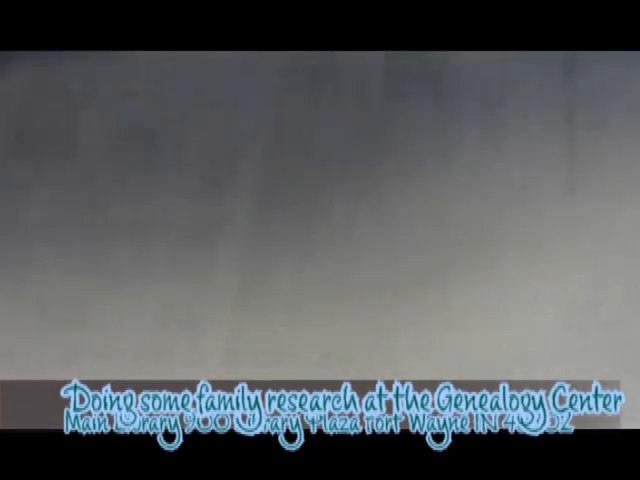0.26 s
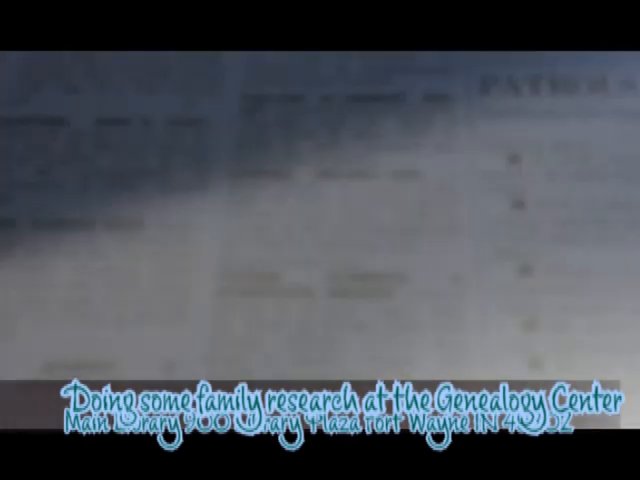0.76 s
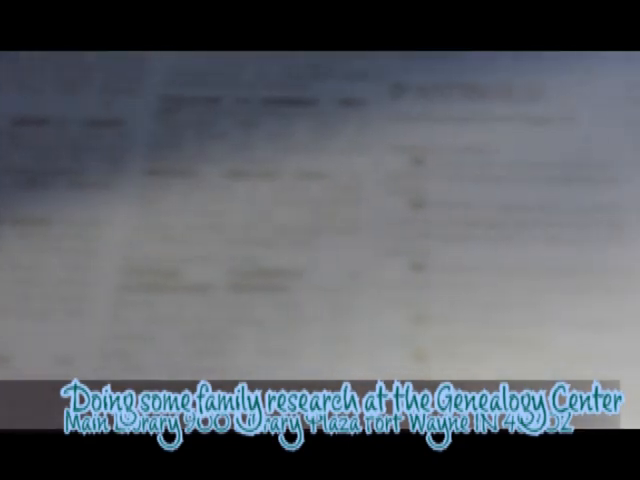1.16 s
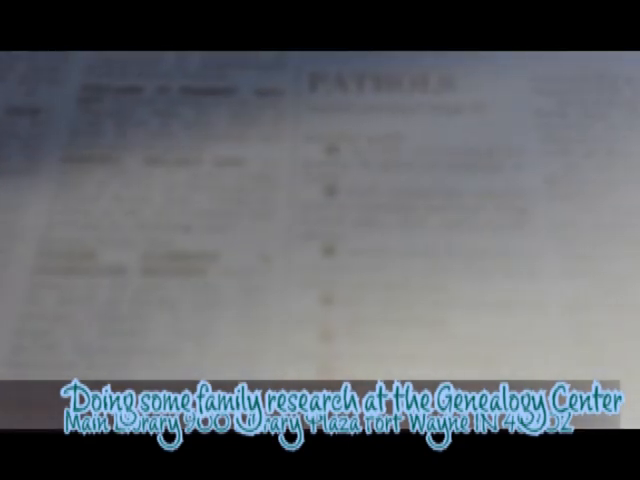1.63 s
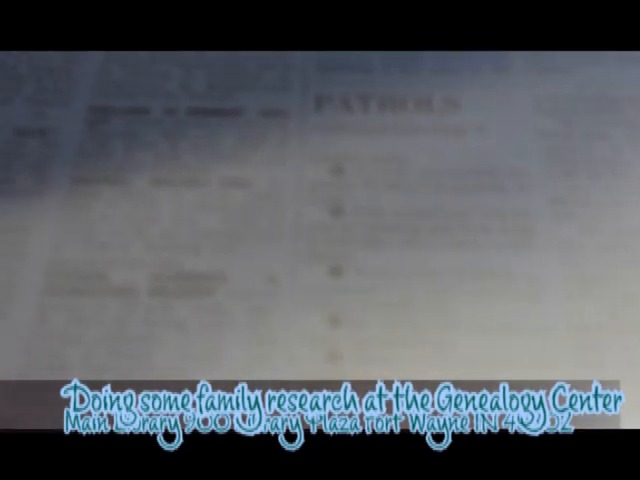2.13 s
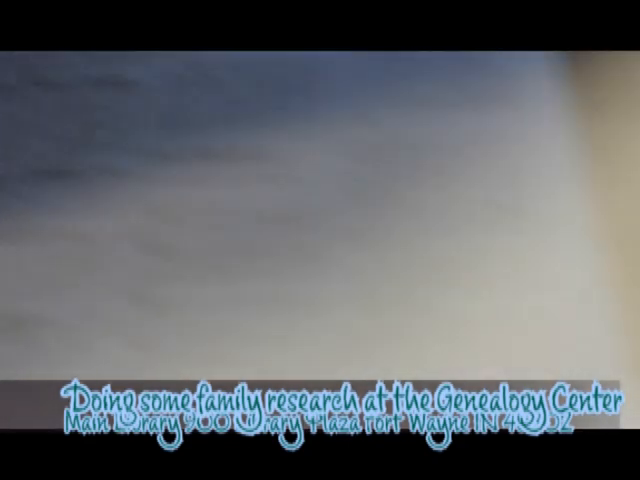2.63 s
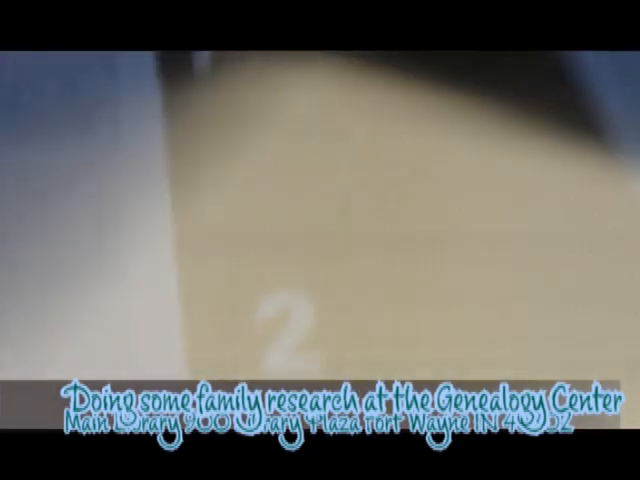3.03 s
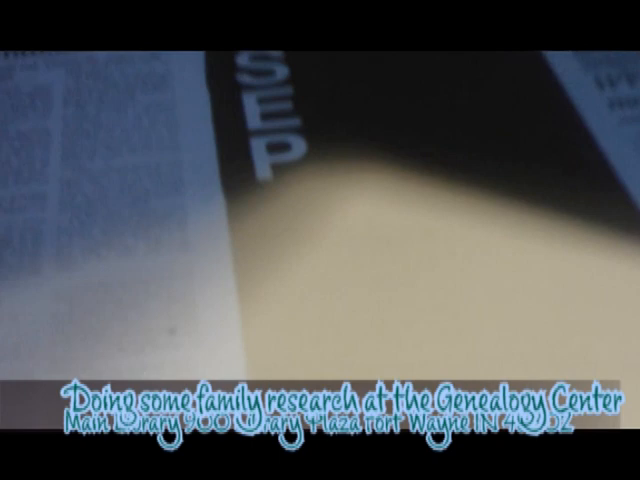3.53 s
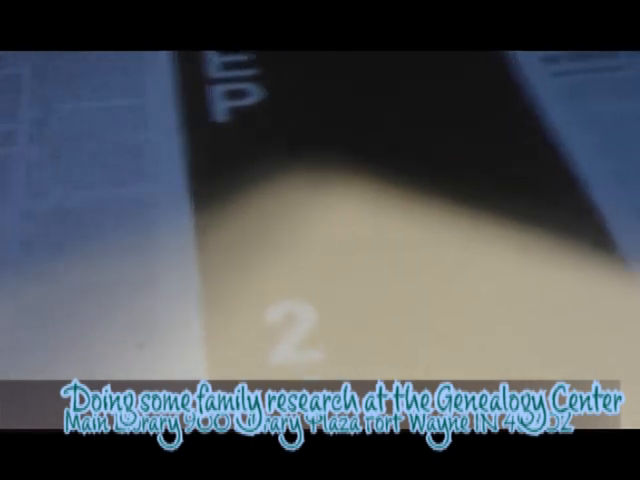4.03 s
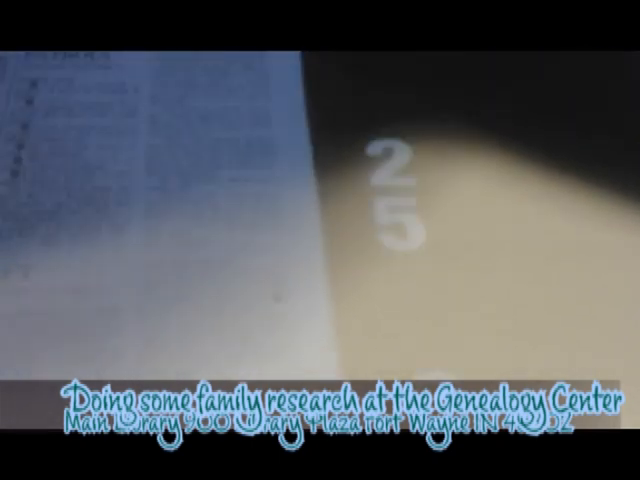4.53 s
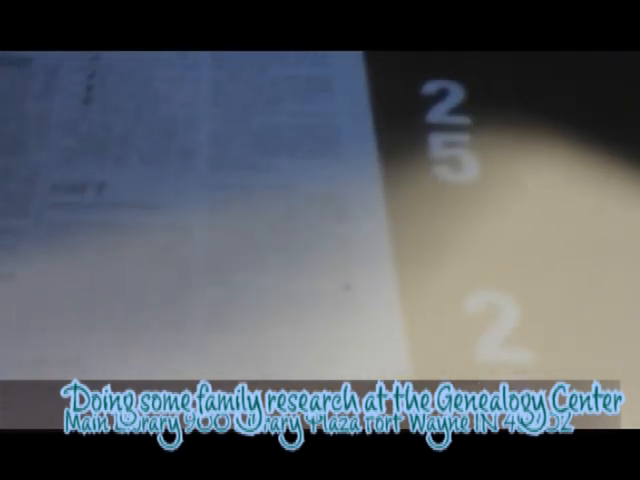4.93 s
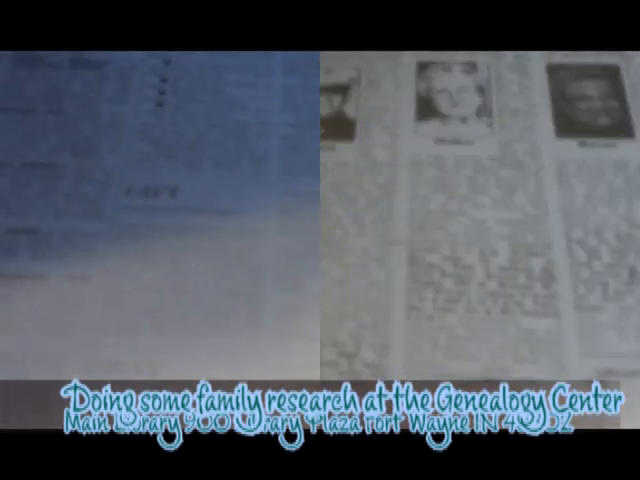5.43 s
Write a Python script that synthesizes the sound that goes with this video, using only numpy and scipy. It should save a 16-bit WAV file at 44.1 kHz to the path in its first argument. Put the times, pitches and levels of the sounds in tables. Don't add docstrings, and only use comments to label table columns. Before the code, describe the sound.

Very close handling noise on a hollow plastic camera shell, over distant fan hum, soft hiss and a barely audible rapid high electronic chirping. A sharp button click comes near the start, followed by finger slides, sparse ticks and quiet gaps. Creaks and dull knocks return midway. Near the end a latch snaps loudly in a tight cluster, everything cuts to silence for an instant, and another bright click follows.

```python
import sys
import numpy as np
from scipy import signal
from scipy.io import wavfile
from scipy.ndimage import uniform_filter1d

SR = 44100
rng = np.random.default_rng(int(sys.argv[2]) if len(sys.argv) > 2 else 0)


def store_pcm(level_fs):
    pcm = np.round(np.clip(level_fs, -1, 1) * 32767).astype(np.int16)
    wavfile.write(sys.argv[1], SR, np.atleast_2d(pcm).T)


def level_to_linear(level):
    exponent = np.asarray(level, float) / 20
    return 10 ** exponent


N = 250047

# frequency in Hz, level in dB per Hz.
ROOM_SPECTRUM = [(25, -38.5), (50, -23), (118, -10), (180, -8), (270, -6.5), (400, -9), (560, -10.5),
                 (750, -16), (1200, -21), (2000, -23.5), (2600, -23.5), (4000, -28.5), (7000, -31),
                 (13200, -34)]
# frequency in
# Hz, width in Hz, level in dB.
HUMS = [(122.8, 72, -65), (176.5, 14, -64), (370, 13, -69), (2600, 100, -78.5)]

# frequency in Hz, width in Hz, level in dB.
LOW_MODES = [(200, 130, -8), (420, 73, 0.5), (610, 120, -2), (740, 100, -5.5), (900, 180, -5.5)]
MIDDLE_MODES = [(1173, 200, -6.5), (1324, 136, -2), (1608, 160, 3), (1850, 150, -10)]
SHELL_MODES = [(2200, 240, -5.5), (2430, 174, 1), (2675, 118, 2), (2910, 170, -4.5), (3480, 376, -7.5)]
HIGH_MODES = [(4060, 133, -3), (4460, 690, -5), (5100, 260, -1), (5800, 850, -9.5), (6580, 400, -11),
              (7400, 900, -13)]
TOP_MODES = [(8400, 250, 3.5), (8960, 990, -8), (11600, 1400, 4)]
# frequency in Hz, width in Hz, level in dB.
CASE_MODES = [(346.5, 35, -6), (420, 27, -0.5), (570, 53, -3.5), (725, 78, -5.5), (860, 140, -19)]

# start in seconds, hardest in seconds, end in seconds, strength in dB, hollowness in dB.
BRUSHES = [(0, .07, .16, -66, 7), (.12, .19, .3, -58.5, -9), (.2, .26, .3, -59, 3), (.29, .32, .37, -59, 4),
           (.37, .41, .53, -60.5, 2), (1.55, 1.7, 1.82, -68, 0), (1.84, 1.95, 2.12, -66.5, 2),
           (2.4, 2.48, 2.7, -67.5, 6), (2.55, 2.7, 2.78, -65, 0), (2.68, 2.79, 2.92, -57, 4),
           (2.8, 2.88, 3.06, -60.5, 2), (5.33, 5.35, 5.39, -58.5, -2)]
# start in seconds, hardest in seconds, end in seconds, strength in dB, hollowness in dB.
SLIDES = [(.47, .55, .68, -51, -6), (.55, .67, .78, -50.5, -4), (.66, .76, .89, -53, -4),
          (1.03, 1.055, 1.1, -62, 3), (1.1, 1.19, 1.35, -67, -4), (2.11, 2.15, 2.2, -61, 2),
          (4.05, 4.09, 4.22, -67, 4), (5.0, 5.045, 5.1, -57, -2), (5.07, 5.12, 5.145, -60, -10),
          (5.235, 5.26, 5.265, -49, 8), (5.312, 5.32, 5.331, -41, -3), (5.35, 5.4, 5.43, -57, -6),
          (5.6, 5.62, 5.65, -67, 8)]
# start in seconds, hardest in seconds, end in seconds, strength in dB, hollowness in dB.
GRIPS = [(.345, .372, .4, -51, -5), (2.35, 2.376, 2.42, -48, -3), (3.365, 3.395, 3.43, -46, 2),
         (4.35, 4.43, 4.58, -57.5, -8), (4.5, 4.61, 4.67, -53.5, 0), (4.63, 4.685, 4.78, -52.5, 2),
         (4.74, 4.77, 4.81, -47, -6), (4.77, 4.84, 4.97, -56, 4), (5.142, 5.15, 5.172, -47, -10),
         (5.185, 5.21, 5.224, -42, 0), (5.3, 5.304, 5.311, -34, -6), (5.64, 5.66, 5.69, -56, -1)]
# start in seconds, hardest in seconds, end in seconds, strength in dB, hollowness in dB.
DRAGS = [
    (.82, .875, .9, -60, 1),
    (2.14, 2.24, 2.32, -61, 11),
    (2.22, 2.35, 2.445, -52, 7),
    (4.41, 4.455, 4.52, -63.5, -6),
    (5.15, 5.175, 5.2, -58, 7),
]
# start in seconds, hardest in seconds, end in seconds, strength in dB, hollowness in dB.
SCUFFS = [
    (1.382, 1.392, 1.42, -60, 10),
    (1.39, 1.43, 1.52, -70, 17),
    (3.358, 3.38, 3.41, -52, 9),
    (3.4, 3.43, 3.55, -67, 17),
    (3.5, 3.55, 3.6, -72, 17),
    (3.57, 3.588, 3.62, -58, 11),
    (3.58, 3.62, 3.74, -68, 20),
    (5.51, 5.53, 5.62, -72, 12),
]
# middle in dB, high in dB, top in dB, swell power (higher builds more gently).
BRUSH_COLOUR = (-7.5, -6, -12.5, 1.5)
SLIDE_COLOUR = (-6, -12, -28, 1.4)
GRIP_COLOUR = (-3.5, -18, -36, 2.2)
DRAG_COLOUR = (3.5, -5, -40, 1.6)
SCUFF_COLOUR = (1.5, -8, -30, 2.4)

# time in seconds, peak in dB, weight in dB, brightness in dB.
TICKS = [(0.158, -50, -13, -12), (0.2049, -41.5, -16, -14), (0.2374, -49, -11, 1), (0.2376, -62, -5, 17),
         (0.1582, -70, -5, 20), (0.3691, -45, -19, -18), (0.5372, -44, -17, -23), (0.8658, -42, -4, -17),
         (0.8771, -44, -10, -6), (1.0258, -39.5, -21, -7), (1.2894, -54, -13, 5), (1.3897, -49, -12, -5),
         (1.442, -53, -7, -2), (2.373, -38, -13, -25), (2.795, -46, -5, -14), (2.8513, -45, -10, -11),
         (3.0116, -47, -18, -8), (3.053, -52, -3, -13), (3.3686, -38, -9, -8), (3.3776, -43, -6, -19),
         (3.399, -50, -14, -22), (3.5825, -48, -3.5, -5), (4.6114, -38.5, -8, -20), (4.6444, -49, 4, -20),
         (4.7683, -42, -6, -14), (5.3245, -46, -5, 8), (5.317, -44.5, -4, -18.5), (5.322, -34, -2.5, -6),
         (5.6446, -33, -2, -17)]
# time in seconds, peak in dB, weight in dB, brightness in dB.
RATTLES = [
    (1.7065, -48, -23, -16),
    (2.1317, -42.5, -7, -2),
    (3.8094, -47, -8, -6),
    (4.0645, -45, -4, -8),
    (4.6779, -41, 0, -22),
    (5.1466, -32, -8, -26),
]
# time in seconds, peak in dB, weight in dB, brightness in dB, rattle in ms.
PRESSES = [
    (0.2826, -17, -4, -16, 3),
    (.2866, -29, 3.5, -26, 5),
    (5.4999, -18.5, -5, -4.5, 2.2),
    (5.5032, -24, -4.5, -24, 4.2),
    (5.598, -38, -17, 0, 3.8),
]
# time in seconds, peak in dB, weight in dB, brightness in dB, rattle in ms.
LATCH = [(5.2022, -35.5, -4, -5, 3), (5.212, -39, 3, -22, 30), (5.2237, -16, -3, -30, 1.2),
         (5.2258, -22, -7, -22, 2.4), (5.26, -36.5, -8, -5, 3), (5.2696, -27, -3, -9, 2.2),
         (5.2725, -5, -20, -9, 1.5), (5.2746, -11.5, -11, -9, 2.4), (5.2852, -19, -5, -23.5, 4),
         (5.2873, -15, -4, -19, 5), (5.2976, -5, -6.5, -10, .6), (5.301, -15, -6, -7.5, 3.3)]
# time in seconds, peak in dB, weight in dB, brightness in dB, rattle in ms.
SNAP = [
    (5.2908, -12, -11, -15, 6),
    (5.2928, -9, -16, 5, 1.4),
    (5.2938, -4, -20, -8, 3),
    (5.2953, -2, -19, -5, 2.8),
]

# time in seconds, peak in dB, pitch in Hz, 60 dB decay in seconds.
BUMPS = [(.243, -41, 420, 0.037), (0.2822, -12.5, 796, 0.016), (0.297, -26, 493, 0.016),
         (0.3087, -28.5, 496, 0.007), (.354, -41.5, 397, 0.02), (.379, -33, 396, 0.016),
         (0.4128, -26.5, 520, 0.0077), (.595, -42.5, 450, 0.022), (1.0762, -37.5, 510, 0.013),
         (1.392, -38.5, 424, 0.088), (2.901, -41, 447, 0.016), (3.38, -28, 462, 0.067),
         (3.383, -39, 93, 0.25), (3.411, -37, 200, 0.04), (3.587, -42, 570, 0.019), (3.629, -39, 200, 0.05),
         (3.648, -41, 280, 0.07),  (3.811, -42.5, 160, 0.036), (5.146, -42.5, 736, 0.052),
         (5.2226, -25, 218.5, 0.037), (5.2245, -28, 860, 0.03), (5.2716, -17, 442, 0.012),
         (5.2928, -18, 720, .03), (5.2865, -23, 800, .02), (5.319, -25, 650, 0.025),
         (5.333, -33.5, 740, 0.034), (5.4996, -11.5, 820, 0.016), (5.5, -25, 300, 0.029),
         (5.512, -33, 660, 0.022), (5.598, -31, 680, 0.02)]
# time in seconds, peak in dB, pitch in Hz, 60 dB
# decay in seconds.
RINGS = [(1.396, -41, 630, .12), (5.2238, -11, 2516, .016), (5.2936, -4, 2600, .02),
         (.2828, -19, 3350, .011), (.283, -22, 1900, .009), (0.2829, -7.5, 1420, 0.011),
         (0.2827, -19, 2530, 0.022), (0.2826, -26, 1110, 0.009), (0.4126, -34, 1210, 0.008),
         (3.379, -33, 1300, 0.015), (3.373, -37, 1300, .015), (3.369, -42, 1150, .015),
         (3.588, -46, 1100, .025), (3.583, -51, 4400, .015), (3.811, -47, 1450, .025),
         (3.39, -50, 6400, .05), (5.147, -42, 1150, .025), (5.2933, -7, 1490, 0.025),
         (5.2931, -14.5, 1946, 0.035), (5.3015, -47, 11400, 0.085), (5.3, -30, 6700, .012),
         (1.414, -44, 440, 0.2), (1.431, -55, 129.5, 0.3), (2.854, -40.5, 3620, .012),
         (3.012, -51.5, 3570, 0.013), (5.4993, -8.5, 1425, .012), (5.5005, -20.5, 1120, .01),
         (5.501, -19.5, 2520, 0.016), (5.501, -16.5, 3450, 0.0078), (5.504, -48, 3850, 0.078),
         (5.598, -21.5, 852, 0.023), (.2885, -30, 2180, .02), (2.345, -56, 4060, 0.15)]
# time in seconds, peak in dB, pitch in Hz, 60 dB decay in seconds.
CLINKS = [(.2826, -29, 5500, .007), (.2828, -33, 6650, .01), (.2826, -36, 11000, .005),
          (.2842, -21, 1744, .012), (.284, -32, 3700, .01), (.2875, -28, 2420, .02),
          (5.2237, -20, 3700, .006), (5.2237, -26, 4800, .006), (5.224, -38, 6500, .008),
          (5.2025, -34, 2600, .01), (5.209, -36, 2700, .012), (5.2145, -33, 1500, .05),
          (5.2185, -36, 2700, .015), (5.2726, -12, 4920, .008), (5.2726, -8, 3400, .008),
          (5.2728, -20, 6400, .005), (5.275, -18, 2600, .018), (5.27, -32, 5500, .008),
          (5.2935, -5, 3100, .016), (5.294, -19, 4800, .013), (5.2938, -20, 5650, .016),
          (5.293, -22, 7740, .015), (5.2945, -22, 10920, .008), (5.3025, -24, 2500, .012),
          (5.3165, -32, 3000, .012), (5.3205, -30, 2700, .015), (5.324, -32, 1900, .012),
          (5.5002, -27, 6385, .009), (5.5002, -29, 5050, .009), (5.598, -35, 5600, .009),
          (5.598, -32, 2650, .012), (5.598, -38, 6600, .008), (5.598, -35, 8200, .008),
          (5.598, -37, 7400, .008), (5.6452, -34, 3050, .012), (3.366, -40, 2800, .018),
          (3.3765, -44, 4000, .012), (3.399, -38, 2600, .025), (3.407, -44, 2600, .03),
          (4.6445, -36, 2700, .025), (4.679, -40, 2500, .03), (4.678, -39, 1480, .045),
          (4.77, -43, 1620, .06), (4.766, -40, 2550, .04), (4.613, -43, 3000, .015),
          (4.657, -44, 1500, .015), (4.823, -46, 1500, .03), (4.836, -43, 1500, .04)]
# time in seconds, peak in dB, pitch
# in Hz, 60 dB decay in seconds.
MORE_CLINKS = [(.1585, -54, 8500, .015), (.1585, -53, 11200, .015), (.2378, -44, 8500, .025),
               (.2378, -45, 10800, .015), (.2378, -48, 11800, .015), (.2075, -50, 3400, .03),
               (.2827, -35, 8700, .006), (.2827, -34, 10200, .005), (.2827, -33, 12000, .005),
               (.2845, -38, 5600, .008), (.867, -48, 1600, .07), (1.442, -50, 2650, .02), (2.32, -52, 4060, .12),
               (2.371, -38, 2650, .02), (3.811, -43, 2650, .03), (5.147, -39, 3000, .03),
               (5.147, -41, 1480, .035), (5.2265, -30, 1480, .025), (5.2265, -34, 1800, .02),
               (5.228, -39, 2100, .015), (5.227, -50, 5600, .015), (5.2695, -29, 1750, .012),
               (5.27, -33, 4100, .008), (5.2725, -19, 5600, .008), (5.2725, -20, 4100, .007),
               (5.275, -24, 3050, .015), (5.2968, -5, 3050, .012), (5.287, -15, 2500, .03),
               (5.2885, -17, 3000, .02), (5.2865, -19, 2050, .025), (5.293, -14, 6500, .012),
               (5.297, -23, 5700, .01), (5.297, -28, 6500, .01), (5.2965, -31, 11500, .012),
               (5.2965, -32, 10300, .01), (5.319, -35, 1450, .025), (5.503, -28, 1750, .018),
               (5.503, -26, 1450, .018)]
# time in seconds, peak in dB, pitch in Hz, 60 dB decay in seconds.
KNOCKS = [(.283, -28, 270, .025), (.2835, -30, 415, .028), (.2965, -28, 850, .018), (5.2, -36, 750, .015),
          (5.2115, -36, 850, .015), (5.242, -40, 600, .015), (5.2485, -36, 750, .015),
          (5.2535, -38, 700, .012), (5.2715, -17, 620, .012), (5.4995, -30, 270, .02),
          (5.2925, -30, 280, .018), (5.2925, -23, 450, .014), (5.286, -31, 450, .025),
          (5.297, -24, 870, .02), (5.644, -47, 150, .05), (5.644, -49, 700, .02), (5.2245, -32, 480, .035),
          (3.585, -45, 280, .07), (3.81, -51, 700, .03), (5.318, -43, 280, .04), (5.303, -27, 750, .02),
          (5.644, -44, 500, .03), (5.598, -45, 150, .04), (5.512, -38, 860, .03), (.412, -45, 160, .04),
          (.54, -44, 600, .02), (1.392, -44, 450, .03), (3.63, -41, 350, .04), (3.46, -48, 250, .05),
          (3.63, -48, 100, .2), (3.3935, -31, 500, .02), (3.405, -31, 480, .025), (3.4245, -36, 300, .03),
          (3.434, -39, 400, .03), (4.614, -43, 700, .02), (4.656, -43, 700, .02), (4.675, -42, 750, .015),
          (4.735, -45, 500, .02), (4.762, -42, 750, .03), (4.817, -45, 550, .02), (4.831, -45, 500, .03)]

SILENCE_START_S, SILENCE_END_S = 5.4115, 5.4965


def evened(x):
    return x / np.sqrt(np.mean(x ** 2) + 1e-20)


def peaked(x):
    return x / (abs(x).max() + 1e-20)


def add(mix, s, sound):
    part = mix[round(s * SR):][:len(sound)]
    part += sound[:len(part)]


def ring(x, modes, damping=1, sign=-1):
    out = np.zeros(len(x))
    for k, (hz, width, db) in enumerate(modes):
        r = np.exp(-np.pi * width * damping / SR)
        poles = [1, -2 * r * np.cos(2 * np.pi * hz / SR), r * r]
        out += sign ** k * level_to_linear(db) * signal.lfilter([1 - r, 0, r - 1], poles, x)
    edges_hz = [0.82 * modes[0][0], 1.18 * modes[-1][0]]
    return signal.sosfilt(signal.butter(2, edges_hz, "band", fs=SR, output="sos"), out)


def room_tone():
    frames, hz = N // 256 + 5, np.fft.rfftfreq(1024, 1 / SR)
    real, imaginary, patches = rng.standard_normal((frames, 513, 3)).T
    patches = uniform_filter1d(patches, size=14, axis=0)
    patches = evened(uniform_filter1d(patches, size=12, axis=1))
    corner_hz, corner_db = np.transpose(ROOM_SPECTRUM)
    level_db = np.interp(np.log(hz + 1), np.log(corner_hz + 1), corner_db)
    spectra = (real + 1j * imaginary) * level_to_linear(level_db[:, None] + 1.5 * patches)
    air = signal.istft(spectra, nperseg=1024, noverlap=768)[1][:N]
    out = level_to_linear(-56.5) * evened(air)
    for hum_hz, width, db in HUMS:
        out = out + level_to_linear(db) * evened(ring(rng.standard_normal(N), [(hum_hz, width, 0)]))
    return out


def rub(row, colour, body, slips_per_s=5000, uneven_db=2, stutter_db=-1.0):
    start, hardest, end, shell_db, low_db = row
    middle_db, high_db, top_db, swell = colour
    t = np.arange(start, end, 1 / SR)
    pressure = np.sin(np.pi / 2 * np.interp(t, [start, hardest, end], [0, 1, 0])) ** swell
    slips = rng.standard_normal(len(t)) * (rng.random(len(t)) < slips_per_s / SR)
    slips = slips * level_to_linear(uneven_db * np.minimum(rng.exponential(1, len(t)), 2.5))
    stutter = level_to_linear(stutter_db * evened(uniform_filter1d(rng.standard_normal(len(t)), size=300)))
    drive = (evened(slips) + 0.9 * rng.standard_normal(len(t))) * stutter
    groups = ((SHELL_MODES, 0), (body, low_db), (MIDDLE_MODES, middle_db),
              (HIGH_MODES, high_db), (TOP_MODES, top_db))
    sound = sum(level_to_linear(shell_db + db) * evened(ring(drive, modes, 0.86)) for modes, db in groups)
    return start, sound * pressure


def chirps():
    first_s, per_second, length_ms = .0097, 30.006, 12
    out, t = np.zeros(N), np.arange(round(length_ms * SR / 1000)) / SR
    for k, (detune, phase, size) in enumerate(rng.standard_normal((171, 3))):
        tone = np.sin(2 * np.pi * (6005 + 25 * detune) * t + 9 * phase)
        tone = tone * signal.windows.tukey(len(t), .6)
        s = first_s + k / per_second
        shift_s = .0035 * (s > SILENCE_END_S)
        add(out, s - t[-1] / 2 - shift_s, level_to_linear(-67.5 - 1 + 1.1 * size) * tone)
    return out


def tick(row, edge_db, noise, contact):
    s, shell_db, middle_db, high_db, ms = row
    t = np.arange(len(noise)) / SR
    groups = ((SHELL_MODES, 0, 1), (MIDDLE_MODES, middle_db, .9),
              (HIGH_MODES, high_db, .8), (TOP_MODES, high_db + edge_db, .7))
    out = 0
    for modes, db, shorter in groups:
        drive = noise * np.exp(-t * 2300 / (max(ms, .3) * shorter))
        drive[0] = contact
        out = out + level_to_linear(shell_db + db) * peaked(ring(drive, modes, 2.3, sign=1))
    return s - .0002, out


def bump(row, noise, stirred=0.35):
    s, db, hz, t60 = row
    t = np.arange(len(noise)) / SR
    fall = level_to_linear(-60 * t / max(t60, .004)) * (1 - np.exp(-t * hz * 5))
    mode = np.sin(2 * np.pi * hz * t) * fall
    mode = signal.sosfilt(signal.butter(2, 0.55 * hz, "high", fs=SR, output="sos"), mode)
    body = peaked(ring(noise * fall ** 2, LOW_MODES, 3.3))
    return s, level_to_linear(db) * peaked(peaked(-mode) + stirred * body)


def desk_tail(hand):
    t = np.arange(5000) / SR
    tail = rng.standard_normal(5000) * (rng.random(5000) < .05) * level_to_linear(-60 * t / 0.11) * (t > .003)
    return level_to_linear(-26.5) * signal.oaconvolve(hand, tail / np.linalg.norm(tail))[:N]


def scene():
    hand = np.zeros(N)
    ticks = [(*row, 4.4) for row in TICKS] + [(*row, 11) for row in RATTLES]
    # rows, level of the top resonances under the brightness in dB, hardness of first contact
    blows = ((ticks, -15, 1.6), (PRESSES, -3, 5.5), (LATCH, -25, 5.5), (SNAP, -6, 5.4))
    for rows, edge_db, contact in blows:
        for row, noise in zip(rows, rng.standard_normal((len(rows), 3000))):
            add(hand, *tick(row, edge_db, noise, contact))
    for row, noise in zip(BUMPS, rng.standard_normal((len(BUMPS), 6000))):
        add(hand, *bump(row, noise))
    for rows in (RINGS, CLINKS, MORE_CLINKS, KNOCKS):
        for row in rows:
            add(hand, *bump(row, np.zeros(6000), 0))
    hand = signal.sosfilt(signal.butter(4, 75, "high", fs=SR, output="sos"), hand)
    hand = hand + desk_tail(hand)
    touches = ((SLIDES, SLIDE_COLOUR, LOW_MODES), (BRUSHES, BRUSH_COLOUR, CASE_MODES),
               (DRAGS, DRAG_COLOUR, CASE_MODES), (GRIPS, GRIP_COLOUR, LOW_MODES),
               (SCUFFS, SCUFF_COLOUR, CASE_MODES))
    for rows, colour, body in touches:
        for row in rows:
            add(hand, *rub(row, colour, body))
    return np.tile(hand + room_tone() + chirps(), (2, 1))


def top_cut(x):
    return signal.sosfilt(signal.butter(12, 13890, fs=SR, output="sos"), x)


def record(dry):
    t = np.arange(N) / SR
    gate = np.clip(np.maximum(SILENCE_START_S - t, t - SILENCE_END_S) / 0.001, 0, 1)
    ceiling = 1.05
    limited = ceiling * np.tanh(dry / ceiling)
    limited = signal.oaconvolve(limited, signal.firwin(255, 12750, fs=SR)[None], "same")
    return top_cut(limited * gate)


dry = scene()
out = record(dry)
store_pcm(out)
```